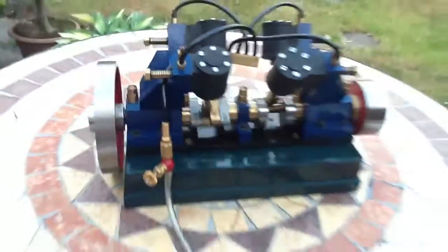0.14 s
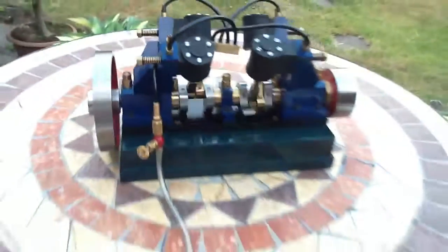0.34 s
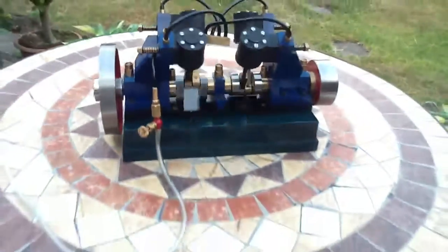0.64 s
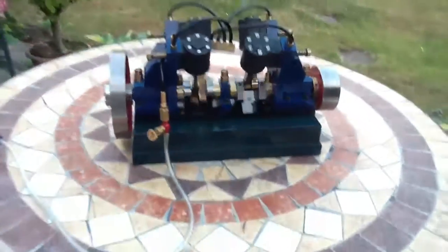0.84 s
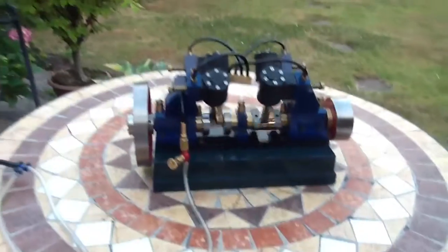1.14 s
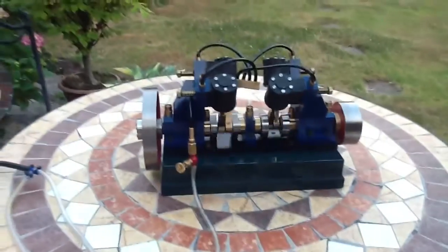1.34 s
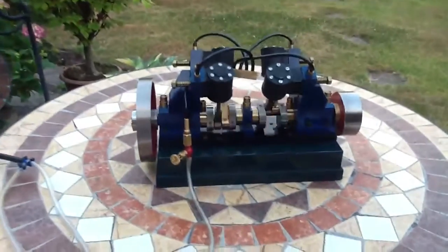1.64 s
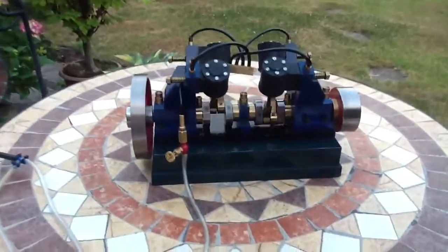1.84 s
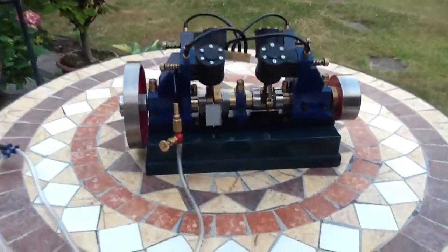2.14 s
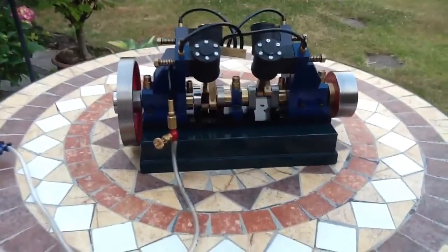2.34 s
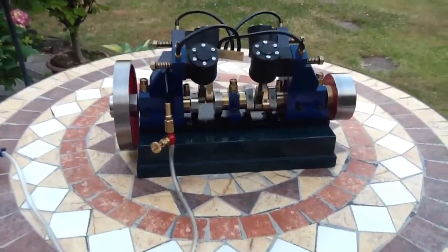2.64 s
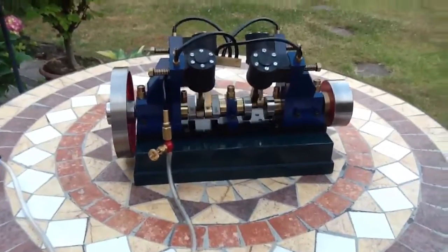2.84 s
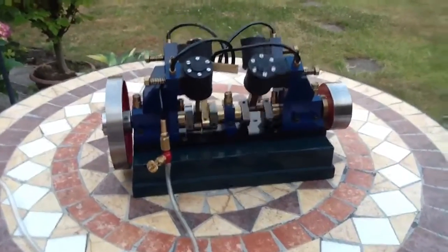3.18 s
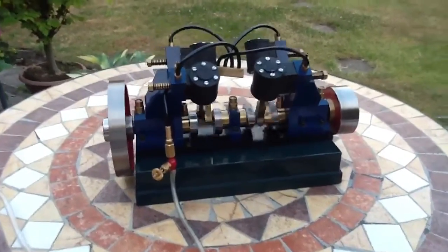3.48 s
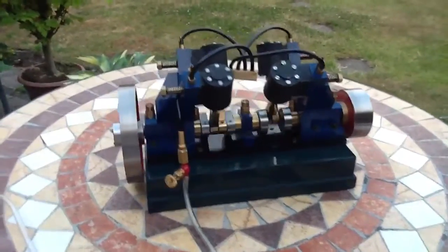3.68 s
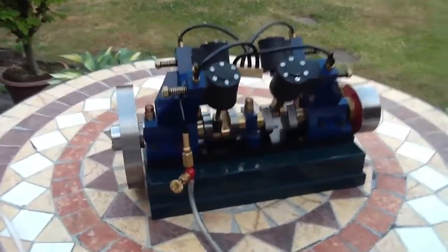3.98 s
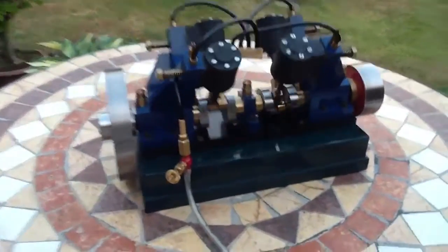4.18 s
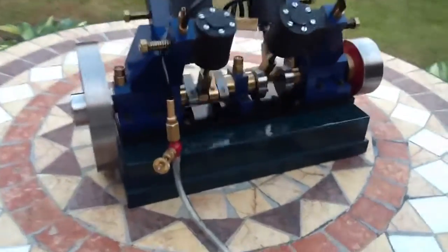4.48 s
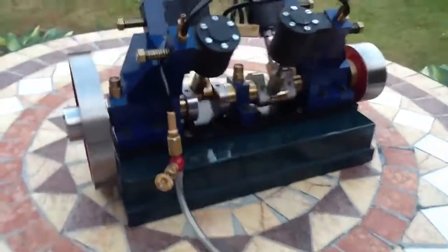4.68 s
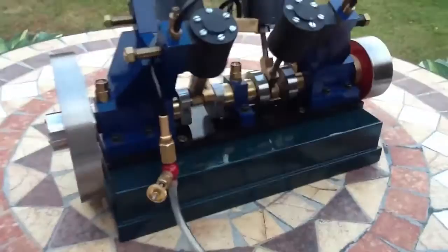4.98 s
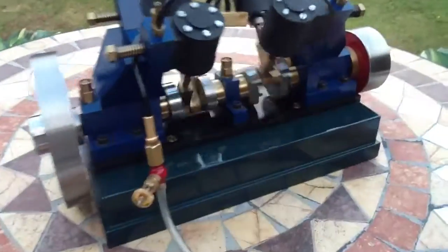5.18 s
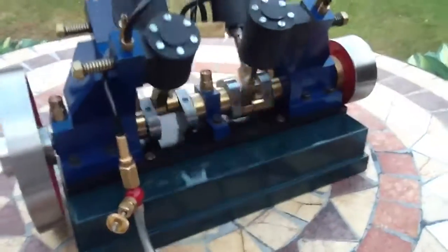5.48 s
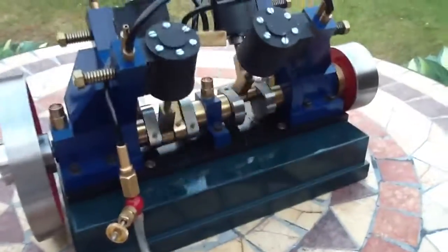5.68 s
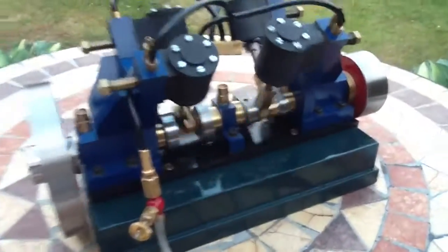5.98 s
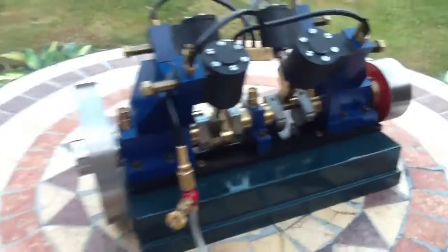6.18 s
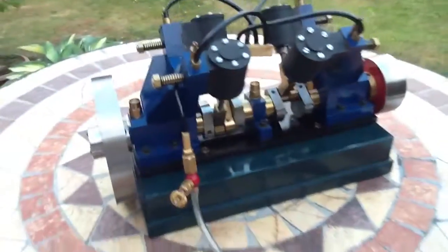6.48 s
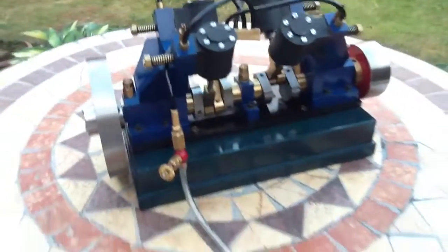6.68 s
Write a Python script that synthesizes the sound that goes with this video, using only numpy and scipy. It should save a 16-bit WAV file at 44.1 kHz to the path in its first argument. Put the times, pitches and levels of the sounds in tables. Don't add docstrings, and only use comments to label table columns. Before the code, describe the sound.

A steady fast chugging of a piston pump, with clattering reeds and motor rumble, mixes with thin airy hiss from a slowly turning model engine, spitting and puffing each turn. Close small microphone, open garden, faint background hum. After almost six seconds a double click cuts the motor; a few dull puffs, tiny knocks and a short rubbery groan follow as leaking air fades.

```python
import sys
import numpy as np
from scipy import signal
from scipy.fft import rfft, irfft
from scipy.io import wavfile
from scipy.ndimage import uniform_filter1d

SR = 44100
rng = np.random.default_rng(int(sys.argv[2]) if len(sys.argv) > 2 else 0)


def how_loud(loudness_db):
    steps = np.asarray(loudness_db, float) / 20
    return 10 ** steps


def generate_wav(sig):
    pcm = np.round(np.clip(np.atleast_2d(sig).T, -1, 1) * 32767).astype(np.int16)
    wavfile.write(sys.argv[1], SR, pcm)


N = 300950
T = np.arange(N) / SR
F = np.arange(N // 2 + 1) * SR / N
STROKE_HZ, FIRST_S, OFF_S = 23.258, .0008, 5.72


def ring(x, hz, width):
    return signal.lfilter(*signal.iirpeak(hz, hz / width, fs=SR), x)


def rings(x, modes):
    out = 0
    for k, (hz, width, db) in enumerate(modes):
        out = out + (-1) ** k * how_loud(db) * ring(x, hz, width)
    return out


def noise(spectrum):
    hz, db = np.transpose(spectrum)
    colour = how_loud(np.interp(np.log(F + 1), np.log(hz), db))
    x = irfft(rfft(rng.standard_normal(N)) * colour, N)
    return x / x.std()


def walk(rate):
    k = int(SR / rate)
    held = np.repeat(rng.standard_normal(N // k + 1), k)
    return uniform_filter1d(uniform_filter1d(held, k), k)[:N]


def pulses(s, size, lead=0):
    keep = (s >= -lead / SR) & (s < T[-1])
    return np.bincount((s[keep] * SR + lead).astype(int), size[keep], N + lead)


def bursts(s, size, decay_ms):
    pole = np.exp(-1000 / (decay_ms * SR))
    two_poles = np.convolve([1, -pole], [1, -pole])
    envelope = signal.lfilter([np.e * (1 - pole)], two_poles, pulses(s, size))
    return envelope * rng.standard_normal(N)


def curves(table):
    s, *columns = np.transpose(table)
    return [np.interp(T, s, c) for c in columns]


# time in seconds, nearness in dB, way round to the tank side (0-1).
LISTENER = [(0, 1.5, 0), (.5, 0.5, 0.16), (1.2, -1, 0.23), (2.8, -0.06, 0.12), (3.5, 1, 0.02), (4, 0, 0.53),
            (4.5, 0.1, 0.7), (5, 0.8, 0.92), (5.7, 0.5, 1), (6.82, 2.5, 1.05)]


def listener():
    return curves(LISTENER)


# frequency in Hz, density in dB per Hz.
GARDEN = [(18, -63), (30, -29), (116, -5), (184, -0.5), (540, -10), (595, -8.5), (630, -12.5), (707, -11),
          (1290, -16), (1390, -16), (1650, -18), (3000, -25), (3900, -21), (6600, -120)]


def garden():
    return how_loud(-57.5 + 0.9 * walk(3.31)) * noise(GARDEN)


# time in seconds, slip rate in Hz, level in dB.
CREAK = [
    (6.421, 223, -46),
    (6.432, 195, -43),
    (6.466, 171, -48),
    (6.478, 165, -50),
    (6.495, 155, -72),
]
# multiple of the slip rate, level in dB.
CREAK_OVERTONES = [(2, -5), (3, -20), (5, -15), (7, -14)]


def creak():
    hz, db = curves(CREAK)
    start, end = CREAK[0][0], CREAK[-1][0]
    phase = 2 * np.pi * np.cumsum(hz * (T > start)) / SR
    overtones = sum(how_loud(d) * np.sin(int(k) * (phase + np.pi / 2) - np.pi / 2) for k, d in CREAK_OVERTONES)
    fading = np.exp(-np.clip(T - start, 0, 1) / .025)
    tone = np.sin(phase) + fading * overtones
    shudder = np.sqrt(2) * how_loud(db) * tone * (T > start) * (T < end)
    rub_s, attack_s, hold_s, release_s = 6.435, 0.022, 0.031, .006
    attack = np.clip((T - rub_s) / attack_s, 0, 1) ** 2
    release = np.exp(-np.clip(T - rub_s - attack_s - hold_s, 0, 1) / release_s)
    rub = how_loud(-50) * attack * release * ring(rng.standard_normal(N), 3860, 160)
    return shudder + rub


# time in seconds, peak level in dB.
SWITCH = [
    (5.7026, -30.5),
    (5.7123, -30),
    (5.722, -39),
]
# frequency in Hz, width in Hz, level in dB.
CONTACT = [(1270, 120, -5), (2550, 240, 1), (4240, 1800, -11), (8400, 4100, -7)]


def switch():
    s, db = np.transpose(SWITCH)
    blows = bursts(s, how_loud(db + 8.5), decay_ms=1.67) + pulses(s + 0.00098, how_loud(db + 24))
    return rings(blows, CONTACT)


# time in seconds, frequency in Hz, peak in dB, rise in ms, decay in ms.
COAST = [(5.711, 398, -37, 2.9, 13), (5.752, 420, -48, 4.9, 11), (5.786, 430, -28.5, 3.6, 3.2),
         (5.798, 200, -42, 5.9, 8.8), (5.805, 412, -35, 11, 12.6), (5.890, 430, -38, 5.7, 13.6),
         (5.906, 168, -46, 6.0, 8.7), (6.033, 330, -47, 3.2, 7.5)]


def coasting():
    out = np.zeros(N)
    for s, hz, db, rise_ms, decay_ms in COAST:
        ms = np.clip(T - s, 0, 1) * 1000
        envelope = (1 - np.exp(-ms / rise_ms)) * np.exp(-ms / decay_ms)
        out += how_loud(db + 7.0) * envelope * np.sin(2 * np.pi * hz * ms / 1000)
    return out


# time in seconds, level in dB.
TICKS = [
    (5.786, -44),
    (6.331, -46),
    (6.4207, -41),
]
# frequency in Hz, width in Hz, level in dB.
PLATE = [(420, 160, -9), (920, 77, 4.5), (1360, 78, -3), (1940, 110, -8), (3450, 300, -6)]


def ticks():
    s, db = np.transpose(TICKS)
    return rings(bursts(s, how_loud(db + 5), decay_ms=0.85) + pulses(s + 0.0013, how_loud(db + 32)), PLATE)


# frequency in Hz, density in dB per Hz.
MOTOR = [(47, -53), (80, -30), (387, -8), (451, -10), (574, -16), (639, -3), (710, -8.5), (1020, -7.5),
         (1410, -15), (3000, -20), (3900, -55), (6600, -120)]
# multiple of the shaft rate, level in front in dB, level on the tank side in dB,
# share of nearness heard.
SLOTS = [
    (21.6, -58, -74, 1),
    (23.03, -69, -59, .5),
    (23.64, -67, -57.5, 7.5),
]


def motor():
    near_db, round_ = listener()
    tank_side = np.clip(round_, 0, 1)
    running = np.clip((OFF_S + 0.13 - T) / 0.22, 0, 1)
    out = running * how_loud(-52.5 - 0.5 * round_ + 2.4 * walk(20)) * noise(MOTOR)
    field_hz = 100
    for k, front_db, tank_db, share in SLOTS:
        db = front_db + (tank_db - front_db) * np.sqrt(tank_side) + share * near_db * (1 - tank_side)
        tone = np.sin(2 * np.pi * (field_hz + round(k) * STROKE_HZ) * T + k)
        out = out + (T < OFF_S) * np.sqrt(2) * how_loud(db) * tone
    return out


def stroke_tops():
    return FIRST_S + np.arange(-2, OFF_S * STROKE_HZ - 1) / STROKE_HZ


# delay after the top in ms, then the signed push on slab, casing, shell,
# intake, head, pipe and tank.
KNOCKS = [(16.685, -0.00075, 0.059, -0.1, 0.47, -0.094, 0.29, 0.3),
          (29.38, 0.12, 0.12, -0.26, -0.16, -0.35, 0.13, 0.001),
          (34.027, -0.048, -0.08, -0.038, 0.85, -0.3, -0.33, 1),
          (41.61, -0.044, 0.26, 0.22, -0.92, 0.3, -0.26, -0.46)]
# frequency in Hz, width in Hz.
BODY = [
    (170.7, 114),
    (254, 59),
    (363, 52),
    (443.3, 24.5),
    (555, 32),
    (631, 22),
    (441.3, 14.2),
]


def pump_body():
    near_db, round_ = listener()
    tank, pipe = 1.3 * round_, 0.7 + 0.21 * near_db - .55 * round_
    lead = SR // 10
    tops, knocks = stroke_tops(), np.array(KNOCKS)
    chance = rng.standard_normal((len(tops), len(knocks), 2))
    s = (tops[:, None] + knocks[:, 0] / 1000 + .00005 * chance[..., 0]).ravel()
    strength = how_loud(1.22 * chance[..., 1])
    modes = []
    for k, mode in enumerate(BODY):
        push = (strength * knocks[:, k + 1]).ravel()
        modes.append(ring(pulses(s, push, lead), *mode)[lead:])
    body = how_loud(15 + 0.75 * round_) * (sum(modes[:-2]) + pipe * modes[-2] + tank * modes[-1])
    body = uniform_filter1d(uniform_filter1d(body, size=21), size=21)
    radiation = (F / 82) ** 6 / np.sqrt(1 + (F / 82) ** 12)
    return irfft(rfft(body) * radiation, N)


# delay after the top in ms, level in dB, decay in ms, dulling in dB per octave.
VALVES = [(14.91, -3.5, 1.17, 8), (23, -13.5, 2, -1), (32.55, -1.5, 1.98, 0.65), (42.15, -6.5, 1.66, 9)]
# frequency in Hz, width in Hz, level in dB.
REED = [(807, 84, 0), (1020, 167, 1), (1258, 64, 1), (1727, 91, 2), (2293, 103, -7.5), (2500, 61, -9),
        (3370, 890, -19)]


def valve_reeds():
    near_db, round_ = listener()
    tops, reeds = stroke_tops(), 0
    for k, (hz, width, mode_db) in enumerate(REED):
        slaps = 0
        for ms, db, decay_ms, dull_db in VALVES:
            when = tops + ms / 1000
            size = how_loud(db - dull_db * np.log2(hz / 1000) + 1.7 * rng.standard_normal(len(tops)))
            slaps = slaps + bursts(when, size, decay_ms) + 4.5 * pulses(when + 0.001004, size)
        shadow_db = -3.5 * round_ * max(np.log2(1500 / hz), 0)
        reeds = reeds + (-1) ** k * how_loud(mode_db + shadow_db) * ring(slaps, hz, width)
    return how_loud(3.5 + 0.068 * near_db - 30.5) * reeds


# time in seconds when the ports shut, fullness of the next exhaust (0-2).
TURNS = [(-.135, 1.6), (.259, .9), (.659, 0), (1.038, 0.88), (1.417, 1.1), (1.784, .9), (2.17, 1.1),
         (2.559, .9), (2.953, 1.2), (3.352, 0.67), (3.771, 0.49), (4.18, 0.98), (4.6, 0.65), (5.004, 1.1),
         (5.418, 0.54), (5.837, 0.59), (6.416, 0)]
SPITS = (0.14, 0.395)


def ports():
    s, fullness = np.transpose(TURNS)
    turns = np.interp(T, s, np.arange(len(s)))
    angle = turns % 1
    inlet = 1. * (angle > 0.435)
    exhaust_opens, exhaust_peaks = .48, 0.64
    exhaust = fullness[turns.astype(int)] * np.interp(angle, [exhaust_opens, exhaust_peaks, 1], [0, 1, .45])
    spit = sum(np.exp(-((angle - at) / 0.019) ** 2) for at in SPITS)
    return uniform_filter1d([inlet, exhaust, spit], size=700, axis=1)


# frequency in Hz, density in dB per Hz.
JET = [(4100, -22.5), (7000, -8.5), (8500, 3.5), (10500, 7), (12000, 5), (14000, -1.5), (15400, -11.5)]
# frequency in Hz, density in dB per Hz.
EDGE = [(8000, -40), (11500, 1.5), (13100, 4.5), (14500, 5.5), (15400, 2.5)]
# frequency in Hz, density in dB per Hz.
LEAK = [(1300, -11.5), (2200, -10), (2900, -8), (3550, -8), (3950, -3.5), (5200, -1), (6600, -2),
        (7500, 0.5), (9700, -34)]
# level with ports shut in dB, rise in dB with inlet, with exhaust and with spit,
# share of nearness heard, rise on the tank side in dB.
LAYERS = [
    (-45, 1.5, 1.2, 1.7, 0.1, -0.65),
    (-44.5, 2.4, 1.5, 3.5, 1.04, 2),
    (-53.5, 2.5, 0.2, 4.6, 0.51, 2.43),
    (-43.5, 3.3, 3.2, 2.2, 1.8, 5.2),
]
# frequency in Hz, width in Hz, depth (0-1).
DIPS = [
    (13300, 800, .4),
    (9450, 530, 0),
]


def air():
    late = np.clip(T - 5.84, 0, None)
    opening = ports() * np.exp(-(late / 0.65) ** 2)
    jet_db, edge_db, leak_db, whistle_db = np.array(LAYERS) @ np.vstack([np.ones(N), opening, listener()])
    dump_db = -1.5 * (1 - np.exp(-late / 0.042))
    unload_db = 2.5 * np.exp(-((T - OFF_S) / 0.026) ** 2)
    pressure_db = -18.5 * late + dump_db + unload_db
    jet = how_loud(jet_db + 0.62 * walk(25.02)) * noise(JET)
    edge = how_loud(edge_db - 2 * late + 0.83 * walk(20)) * noise(EDGE)
    leak = how_loud(leak_db + 0.65 * walk(9.8)) * noise(LEAK)
    whistle = how_loud(whistle_db + 2.0 * walk(24)) * ring(rng.standard_normal(N), 8510, 620)
    ripple_db = 0.35 * np.sin(2 * np.pi * STROKE_HZ * T) * (T < OFF_S)
    hiss = how_loud(pressure_db + 0.25 * walk(30) + ripple_db) * (jet + edge + leak + whistle)
    tank_side = np.clip(listener()[1], 0, 1)
    for (hz, width, depth), share in zip(DIPS, (1 - tank_side, tank_side)):
        cancelled = np.clip(depth * share * (1 + 0.79 * walk(5)), 0, 1)
        hiss = hiss - cancelled * ring(hiss, hz, width)
    flutter = 0
    for hz in np.geomspace(4200, 14800, num=9):
        flutter = flutter + (how_loud(0.9 * walk(14)) - 1) * ring(hiss, hz, hz / 7)
    return hiss + flutter


def scene():
    background = garden() + creak() + switch() + coasting() + ticks()
    compressor = motor() + pump_body() + valve_reeds()
    return np.tile(background + compressor + air(), (2, 1))


def top_cut(x):
    return signal.sosfilt(signal.butter(12, 16490, fs=SR, output="sos"), x)


def record(dry):
    hz, damping, top_hz = 90, 1.2, 15380
    bass_cut = -(F / hz) ** 2 / (1 - (F / hz) ** 2 + 1j * damping * F / hz)
    mix = irfft(rfft(dry) * bass_cut * (F < top_hz), N)
    return top_cut(mix)


dry = scene()
out = record(dry)
generate_wav(out)
```